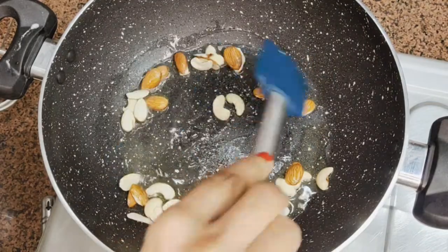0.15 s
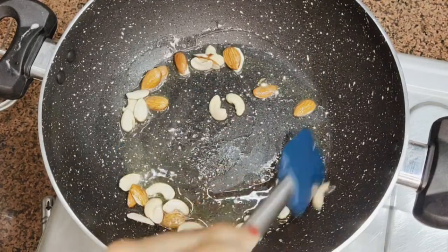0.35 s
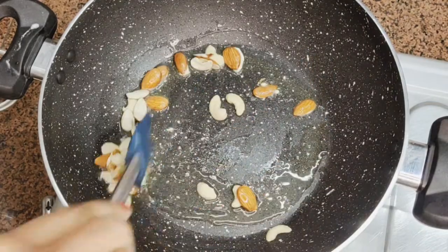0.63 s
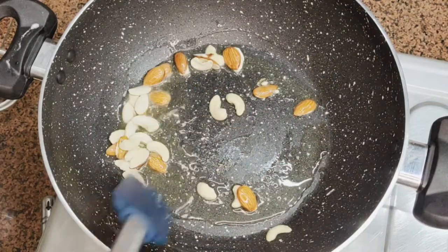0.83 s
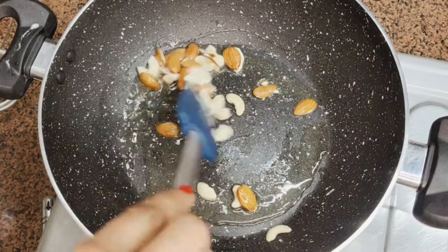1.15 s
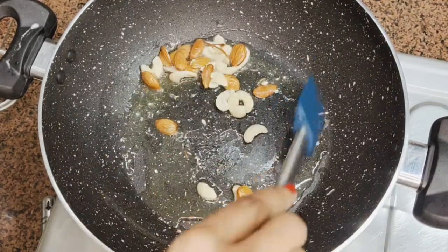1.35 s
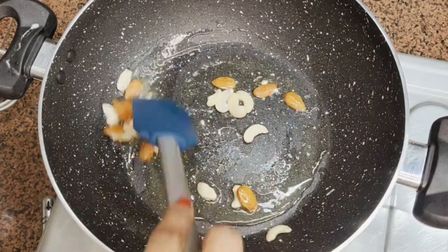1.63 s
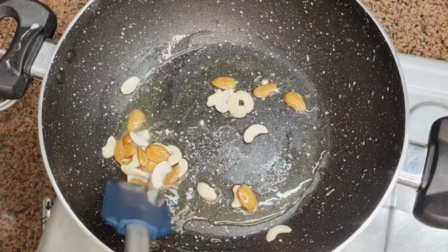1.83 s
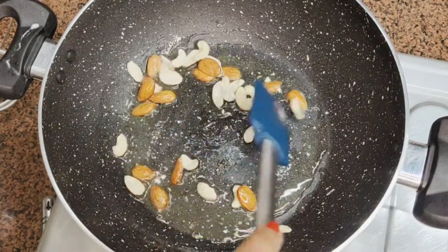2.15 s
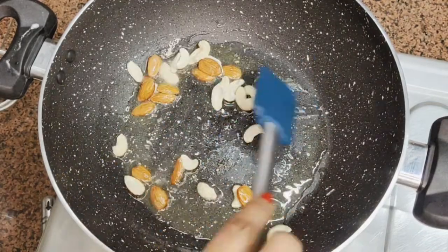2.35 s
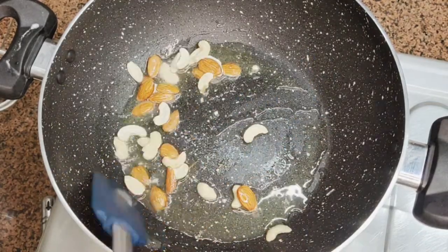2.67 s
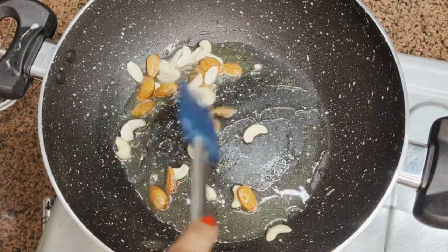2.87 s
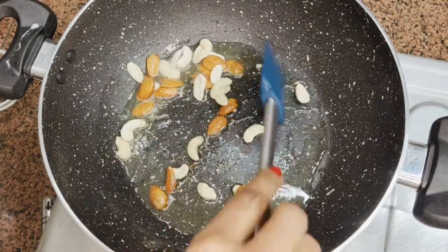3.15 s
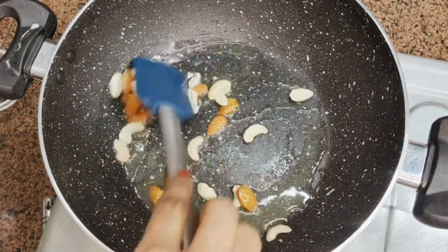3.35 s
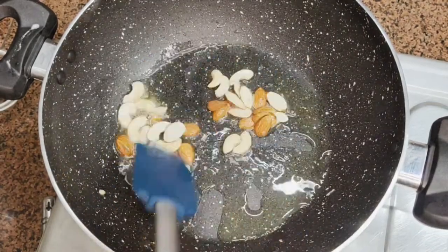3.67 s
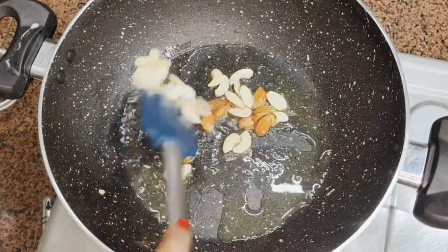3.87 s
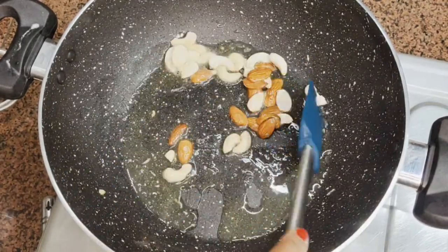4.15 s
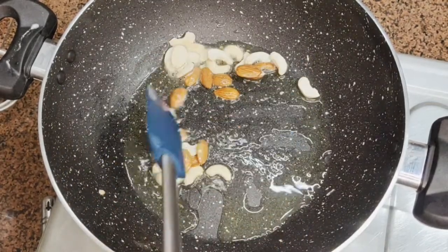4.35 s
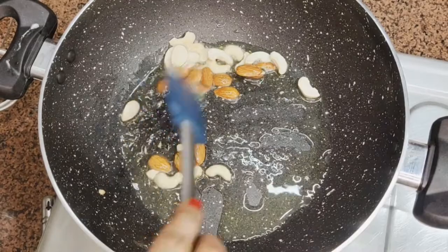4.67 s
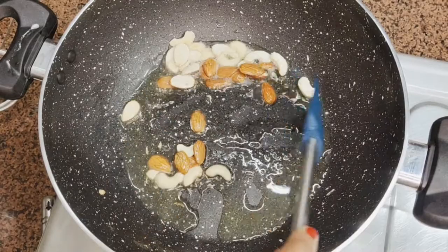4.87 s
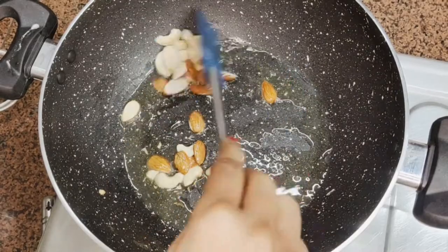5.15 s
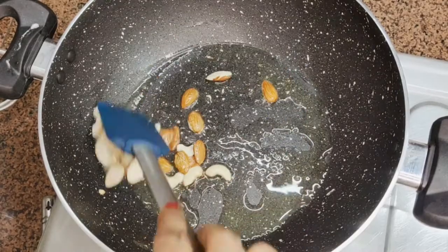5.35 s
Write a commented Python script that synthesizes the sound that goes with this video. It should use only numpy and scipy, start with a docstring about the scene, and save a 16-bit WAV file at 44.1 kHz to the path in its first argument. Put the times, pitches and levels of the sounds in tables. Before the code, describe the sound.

A soft blade strokes through hot fat in a coated pan, several strokes in irregular rhythm. Gritty scraping and low rubbing come with hollow pan knocks, little damped two-note nut taps, sharp cracks and tiny squeaks. Quiet pauses reveal delicate spitting bubbles and faint hum. Near microphones, small room, short reflections, with one very brief dropout around three and a half seconds.

```python
"""A silicone spatula strokes cashews and almonds round a nonstick pan of hot fat on a humming, hissing stove.
From the start friction noise slides and rumbles, bubbles spit, and the soft blade thuds and rings the pan.
Nuts then knock the wall into two damped notes, hard contacts crack, and stick-slip squeaks join in.
A small kitchen echoes the contacts; at about 3.45 s the level drops for an instant with a soft pop."""
import sys
import numpy as np
from scipy import signal
from scipy.fft import rfft, irfft, next_fast_len
from scipy.io import wavfile
from scipy.ndimage import uniform_filter1d

SR = 44100
rng = np.random.default_rng(int(sys.argv[2]) if len(sys.argv) > 2 else 0)


def wrap_up_sound(samples):
    """Save the sound to the file named by the first command line argument, as 16-bit audio."""
    columns = np.atleast_2d(samples).T
    # keep every value between -1 and 1, then stretch to whole-number steps
    tamed = np.clip(columns, -1, 1)
    steps = np.round(tamed * 32767).astype(np.int16)
    wavfile.write(sys.argv[1], SR, steps)


N = 242991
TIME = np.arange(N) / SR   # s
AGE = TIME[:SR * 2 // 5]   # s since a contact

# strokes: [full pressure t/s, swell t/s, hold t/s, relative levels of hiss/dB, fizz/dB, blade rumble/dB]
STROKES = [(0.0, 0.014, 0.025, -54, -59.5, -48), (0.3, 0.088, 0.45, -80, -74, -60),
           (0.559, 0.1, 0.053, -42.5, -60, -49.5), (0.958, 0.019, 0.13, -52.5, -57, -34),
           (1.089, 0.092, 0.072, -47, -57.5, -42), (1.356, 0.019, 0.052, -45.5, -49.5, -70),
           (1.587, 0.25, 0.067, -46.5, -58.5, -51), (1.802, 0.46, 0.031, -56.5, -64, -68.5),
           (2.002, 0.28, 0.09, -51.5, -59, -56), (2.413, 0.08, 0.11, -52.5, -63, -58.5),
           (2.737, 0.023, 0.16, -51.5, -61, -43.5), (3.336, 0.1, 0.076, -44.5, -58, -47),
           (3.512, 0.052, 0.095, -50.5, -61, -52.5), (3.925, 0.15, 0.048, -51, -59.5, -52),
           (4.009, 0.042, 0.0017, -42.5, -51, -40), (4.308, 0.075, 0.059, -50, -57, -59),
           (4.639, 0.017, 0.0098, -35, -46, -45), (5.151, 0.1, 0.044, -43.5, -55, -42),
           (5.233, 0.027, 0.091, -39, -61, -49.5)]
# spectra of sliding hiss, fine fizz, blade rumble and stove: [f/Hz, relative level per Hz/dB]
HISS_SPECTRUM = [(400, -6.5), (750, -36), (1000, 3.5), (1300, 0.5), (1600, -13.5), (2000, 0), (2500, 1.5),
                 (3600, 4), (4900, 0.5), (6500, -4.5), (9000, -13), (16000, -53)]
FIZZ_SPECTRUM = [(2500, -22), (5000, 1), (6800, -0.5), (7800, -2), (8600, -3.5), (9500, -10), (11000, -8),
                 (12200, -12.5), (14500, -12), (16000, -40)]
RUMBLE_SPECTRUM = [(25, -43), (55, -53), (90, 2.5), (120, -3), (180, 2.5), (230, -0.5), (300, 1.5),
                   (420, 4.5), (540, 5.5), (680, 6), (950, 3.5), (1300, -4.5), (2500, -42), (8000, -78)]
STOVE_SPECTRUM = [(25, -22), (60, 19), (110, -6), (180, 0), (350, -8), (540, -10), (850, -79), (1300, -3),
                  (3000, -24), (7500, -52), (10000, -11), (15000, -4)]
# high modes of the wall, stirred by sliding: [f/Hz, width/Hz, relative level/dB]
HIGH_MODES = [(1704, 147, 20), (2163, 6.7, 11), (2703, 35, 7), (3330, 26, 10), (3910, 10, 10.5),
              (5300, 140, -31), (7920, 61, 9)]
# edges of the bands that flicker separately as the contact shifts: [f/Hz]
PATCH_EDGES = (1500, 2400, 3700, 5600)
# the pan on its support: [f/Hz, relative level/dB, decay by 60 dB t/s]
PAN_MODES = [(118.1, -1, 0.99), (176.8, -2, 0.38), (248.2, -3.5, 0.48), (303.1, -0.5, 0.36),
             (424.7, -2, 0.27), (545.4, -4.5, 0.29), (678, 3, 0.35), (831, -23, 0.25), (917, -10, 0.66),
             (1128, 12.5, 0.051), (1240, 7.5, 0.35), (1344, 13.5, 0.059), (1637, 1, 0.52),
             (2170, 8.5, 0.27)]
# the wall's two notes, damped by blade and fat: [f/Hz, width/Hz]
WALL_NOTES = [(690, 74), (1360, 68)]
# blade landings, lower when softer: [t/s, relative level/dB, centre f/Hz, thud decay by 60 dB t/s, free ring/dB]
BUMPS = [(0.004, -42, 383, 0.11, 2.5), (0.276, -40, 284, .06, -3.5), (0.296, -39.5, 357, 0.074, -3.5),
         (0.391, -48.5, 282, 0.15, 2), (0.944, -33.5, 386, 0.11, 5.5), (0.967, -22, 396, 0.081, -1),
         (0.977, -33, 422, 0.09, 9.5), (0.995, -25.5, 422, 0.083, -2.5), (1.041, -25.5, 516, 0.041, -1.5),
         (1.05, -25, 494, 0.077, -5.5), (1.108, -29, 500, .05, -3), (1.151, -38, 264, 0.11, -4),
         (1.186, -38, 440, 0.058, -15), (1.238, -37.5, 184, .12, -8), (1.449, -30.5, 137, 0.15, 4.5),
         (1.475, -32.5, 142, 0.21, -6), (1.536, -51, 140, 0.13, -14), (1.607, -26, 423, 0.049, -10.5),
         (1.72, -35, 410, 0.084, -8.5), (1.754, -44, 403, 0.091, -13), (1.817, -49.5, 324, 0.09, -10),
         (2.705, -28, 946, 0.12, 6), (2.721, -32, 405, 0.19, 8.5), (2.737, -29.5, 317, 0.16, 1),
         (2.757, -35, 402, 0.11, -13), (2.852, -29.5, 430, 0.088, -1.5), (2.881, -41, 248, .12, 1.5),
         (3.311, -30, 570, 0.07, -2), (3.518, -30.5, 410, 0.04, -7), (3.598, -32.5, 370, 0.045, -10),
         (3.69, -43.5, 292, 0.044, -1.5), (3.956, -32, 380, 0.058, -8), (3.992, -33, 384, 0.17, -0.5),
         (4.558, -63.5, 378, 0.076, 12.5), (5.123, -23, 800, 0.038, -10), (5.324, -27, 174, 0.03, -16.5),
         (5.455, -33, 400, 0.086, -8), (5.487, -37.5, 392, 0.044, -13)]
# force spectrum of a landing of reference softness: [f/Hz, relative level/dB]
LANDING_FORCE = [(25, -49), (55, -51), (90, -32), (150, -5.5), (240, -10.5), (400, 3), (850, -4),
                 (1200, -14.5), (2300, -26), (4000, -36), (15000, -95)]
# nuts that knock or skid: [t/s, high note f/Hz, relative low note/dB, relative high note/dB, high note length t/s]
KNOCKS = [(0.06, 1361, -40.5, -39, 0.016), (0.091, 1370, -42, -46, 0.014), (0.124, 1373, -34.5, -22, 0.015),
          (0.425, 1362, -70, -53, 0.043), (0.499, 1357, -60, -24.5, 0.008),
          (0.531, 1366, -58, -32.5, 0.025), (0.55, 1365, -53, -23, 0.0033),
          (0.557, 1390, -49, -23.5, 0.0095), (0.584, 1374, -49, -34, 0.02), (0.947, 1290, -45, -32, 0.0095),
          (0.965, 1445, -26, -34, 0.0096), (1.04, 1320, -32, -33, 0.0046), (1.051, 1330, -38, -32, 0.004),
          (1.074, 1300, -40, -37, 0.005), (1.128, 1280, -36, -32, 0.013), (1.156, 1345, -43, -34, 0.0088),
          (1.186, 1345, -35.5, -33.5, 0.014), (1.279, 1280, -42, -38.5, 0.01),
          (1.355, 1320, -31, -27.5, 0.0035), (1.526, 1356, -50, -33.5, 0.015),
          (1.548, 1320, -49, -36.5, 0.025), (1.589, 1330, -58, -32, 0.01),
          (1.607, 1350, -31, -22.5, 0.0043), (1.941, 1335, -53, -38.5, 0.017),
          (2.005, 1290, -55, -32.5, 0.0037), (2.015, 1370, -28.5, -32, 0.008),
          (2.039, 1403, -35, -44, 0.015), (2.058, 1350, -43, -39, 0.019), (2.076, 1325, -32.5, -38, 0.0079),
          (2.087, 1363, -31, -43, 0.011), (2.114, 1395, -38, -41, 0.0077), (2.16, 1350, -38, -46, 0.0064),
          (2.183, 1340, -45.5, -55, 0.013), (2.222, 1330, -49, -45, 0.0081),
          (2.348, 1323, -52.5, -42.5, 0.015), (2.365, 1347, -47.5, -41.5, 0.012),
          (2.418, 1343, -48.5, -35.5, 0.03), (2.452, 1366, -28, -38, 0.013),
          (2.481, 1310, -31, -56, 0.0054), (2.505, 1337, -35, -31.5, 0.01),
          (2.521, 1366, -47.5, -36, 0.019), (2.55, 1385, -38.5, -56, 0.0046),
          (2.718, 1320, -24, -25, 0.011), (2.788, 1298, -39, -28, 0.019), (2.825, 1360, -47, -32, 0.011),
          (2.963, 1366, -22.5, -22, 0.01), (2.992, 1400, -26.5, -28.5, 0.00444),
          (3.229, 1333, -44.5, -27.5, 0.0093), (3.285, 1285, -64, -32, 0.0059),
          (3.309, 1314, -26.5, -43, 0.024), (3.388, 1294, -36.5, -58, 0.022),
          (3.533, 1380, -42, -41, 0.016), (3.576, 1360, -44, -44, 0.017), (3.871, 1390, -41, -52, 0.0072),
          (3.905, 1340, -40.5, -45, 0.012), (3.92, 1350, -28, -40, 0.0058),
          (3.937, 1390, -27.5, -32, 0.014), (4.261, 1357, -46, -53, 0.016), (4.3, 1360, -39, -41, 0.017),
          (4.325, 1353, -37.5, -38, 0.018), (4.343, 1406, -44, -59, 0.013),
          (4.376, 1350, -39.5, -44, 0.0035), (4.381, 1342, -36.5, -43, 0.02),
          (4.713, 1343, -34, -25, 0.011), (4.773, 1345, -43.5, -30.5, 0.0074),
          (5.12, 1333, -24, -51, 0.032), (5.171, 1352, -35, -46, 0.018), (5.241, 1320, -51, -35, 0.01),
          (5.268, 1340, -53, -36, 0.0087)]
# scuff of a nut's skin: [f/Hz, relative level per Hz/dB]
SCUFF_SPECTRUM = [(250, -7), (600, 2), (1000, -6), (1600, 1.5), (2000, 3.5), (3200, -11.5), (8000, -35.5)]
# hard contacts: [t/s, relative low/dB, middle/dB, treble/dB, top/dB, click aimed at microphones/dB, left-right/dB]
CRACKS = [(0.1234, -39, -42, -54.5, -56.5, -5.5, -4), (0.478, -68, -41, -71, -61, -3.5, -3),
          (0.924, -87, -41.5, -35, -47, -18, -7), (1.361, -33.5, -27, -28, -31, 7.5, -2.5),
          (1.4207, -32, -29, -71, -66, -3, -2), (1.5204, -42.5, -51, -48, -53, 1, 0),
          (1.6669, -46, -51, -51, -45, 1.5, 3), (1.88, -46, -29, -35, -39, 1.5, -4.5),
          (2.341, -66, -52.5, -90, -78, -4, 13), (2.408, -51, -43, -73, -70, -4, 1),
          (2.6222, -48.5, -38.5, -43, -70, 1.5, -5), (2.7045, -32, -34, -44, -88, -5.5, 4),
          (2.784, -36, -39, -59, -74, 0, -9), (2.9637, -42, -43.5, -64, -67, -16, 1),
          (3.229, -80, -41.5, -51.5, -51, -0.5, 8), (3.631, -43.5, -43, -47, -66, -2.5, 0),
          (3.691, -45, -41, -56, -65, 3, 0), (3.9904, -32.5, -33, -27.5, -40.5, 6, -9),
          (4.624, -43.5, -24, -35.5, -45.5, 0.5, 4), (4.7139, -35, -32, -50, -72, -2, -3),
          (4.83, -47, -57, -55, -66, 3.5, -1)]
# brief resonances of a hard contact: [f/Hz, relative level/dB, decay by 60 dB t/s]
SHELL_MODES = [(800, 3.5, 0.0029), (1320, -8.5, 0.02), (1810, -12, 0.028), (2300, -22, 0.028),
               (3100, -5.5, 0.0053), (5300, 1, 0.0054), (7880, 2, 0.0055), (13700, -4, 0.0033)]
# chirps and rasps on the oily coating: [t/s, f/Hz, width/Hz, level/dB, length t/s]
SQUEAKS = [(0.482, 2580, 1700, -43.5, 0.0036), (0.557, 2760, 1880, -37, 0.0077),
           (1.102, 7350, 450, -39.5, 0.0085), (1.146, 8460, 450, -49, 0.006),
           (1.417, 2380, 2400, -36, 0.0018), (1.523, 1900, 1100, -35.5, .002),
           (2.927, 7570, 450, -46, 0.0056), (3.427, 3600, 1900, -41, 0.021),
           (3.803, 3800, 700, -56.5, 0.11), (5.232, 1150, 600, -46, 0.0042),
           (5.241, 2100, 400, -38, 0.0044)]
# stereo width: [f/Hz, side minus mid level/dB]
WIDTH = [(60, -0.5), (150, -17), (350, -13), (700, -3), (1400, -1.5), (3000, 0), (15000, 0)]
# reverberation of the kitchen: [f/Hz, decay by 60 dB t/s]
KITCHEN_T60 = [(120, 0.84), (500, 0.38), (2000, 0.38), (6000, 0.38), (15000, 0.31)]
# spectrum of the echoes: [f/Hz, relative level per Hz/dB]
ECHO_SPECTRUM = [(60, 20.4), (5200, 1.3), (8500, 3.4), (11000, 1.3), (17000, 1.4)]
# brief loss of level: [offset and loss begin t/s, offset ends t/s, level returns t/s]
DROPOUT = (3.453, 3.4767, 3.491)

SWELL_DB = 20   # gained during a stroke's swell
HISS_FADE_DB_PER_S, FIZZ_FADE_DB_PER_S, RUMBLE_FADE_DB_PER_S = 127, 126, 120   # once the blade lets go
# relative levels between strokes, and the spread of the slow rise and fall of the fizz
REST_HISS_DB, REST_FIZZ_DB, SIMMER_SWING_DB = -66, -74, 2.5
LOW_NOTE_DB, HIGH_NOTE_DB = -17, -9.5   # relative to the rumble and hiss levels that drive them
SPITS_PER_S, SPIT_RMS_DB, SPIT_SPREAD_DB, SPIT_Q = 260, -71, 1, 72
SPIT_LOW_HZ, SPIT_HIGH_HZ, SPIT_TILT_DB_PER_OCTAVE = 2250, 11600, -3.5
STOVE_RMS_DB = -73
THUD_CENTRE_HZ = 426   # reference softness
PAN_WANDER = .004   # the blade's load shifts each mode: spread as a share of its pitch
NUT_PAN_DB, NUT_PAN_SPREAD_DB = -1, 6   # left minus right
SCUFF_HIGH_DB, SCUFF_LOW_DB, SCUFF_T60_S = -11.5, -22, .045   # levels relative to the two notes
LOW_NOTE_RATIO, NOTE_WANDER = .516, .02   # low over high pitch; spread as a share of the low pitch
CUTOFF_HZ = 15600


def from_db(db):
    """Logarithmic level: decibels become amplitude gain."""
    return 10 ** (np.asarray(db) / 20)


def rms_one(x):
    """Normalisation: mean power becomes one."""
    return x / np.sqrt(np.mean(x ** 2) + 1e-20)


def at_hz(points, hz):
    """Linear interpolation on a logarithmic frequency axis."""
    freqs, values = np.transpose(points)
    return np.interp(np.log(np.maximum(hz, 1)), np.log(freqs), values)


def dying(t60):
    """Exponential decay: amplitude falls 60 dB in t60."""
    return np.exp(-np.log(1000) * AGE / t60)


def panned(pan_db):
    """Interaural level difference: gains for left and right."""
    return from_db(np.array([[pan_db], [-pan_db]]) / 2)


def add(track, s, sound):
    """Superposition: a sound joins the track at time s."""
    at = max(round(s * SR), 0)
    track[:, at:at + sound.shape[1]] += sound[:, :N - at]


def drift(rate):
    """Low-passed randomness: twice-averaged noise of rms 1."""
    length = int(SR / rate)
    once = uniform_filter1d(rng.standard_normal(N), length)
    return rms_one(uniform_filter1d(once, length))


def coloured(pair, gain_at):
    """Spectral shaping of mid and side: narrow in the bass, wide in the treble; rms 1."""
    size = next_fast_len(pair.shape[1])
    hz = np.arange(size // 2 + 1) * SR / size
    mid, side = rfft(pair, size) * gain_at(hz)
    side = side * from_db(at_hz(WIDTH, hz))
    return rms_one(irfft([mid + side, mid - side], size)[:, :pair.shape[1]])


def noise(spectrum, size=N):
    """Filtered noise: random stereo sound with a given spectrum, rms 1."""
    return coloured(rng.standard_normal((2, size)), lambda hz: from_db(at_hz(spectrum, hz)))


def burst(spectrum, t60):
    """Decaying noise: its envelope starts at rms 1 and is cut off after t60 (10 ms at least)."""
    envelope = dying(t60)[:int(max(t60, 0.01) * SR)]
    shaped = rms_one(noise(spectrum, size=len(envelope)) * envelope)
    sound = shaped * np.sqrt(np.mean(envelope ** 2))
    return np.pad(sound, ((0, 0), (0, len(AGE) - len(envelope))))


def low_cut(x, edge_hz):
    """Second-order high-pass filtering."""
    sos = signal.butter(2, edge_hz, "high", fs=SR, output="sos")
    return signal.sosfilt(sos, x + 1e-18)


def resonance(hz, centre, width):
    """Forced damped oscillator: response of one mode, 1 at its peak."""
    return 1j * hz * width / (centre ** 2 - hz ** 2 + 1j * hz * width)


def swing(hz, clock=AGE):
    """Interchannel phase: a mode's phases differ more where the stereo table is wider."""
    apart = np.arctan(from_db(at_hz(WIDTH, hz))) * rng.choice([-1, 1])
    return np.sin(2 * np.pi * hz * clock + np.array([[apart], [-apart]]))


def grains(per_s, spread_db, smooth):
    """Granular friction: random slips of uneven size on a bed of smooth noise."""
    sizes = from_db(spread_db * np.minimum(rng.exponential(1, N), 3.5))
    slips = (rng.random(N) < per_s / SR) * sizes * rng.uniform(-0.88, 1, (2, N))
    return rms_one(slips) + smooth * rng.standard_normal((2, N))


def pressure(level_dbs, fade_db_per_s, rest_db=-90):
    """Power addition: strokes swell, hold and fade, and overlaps add up; returns dB."""
    power = from_db(rest_db) ** 2
    for (s, swell_s, hold_s, *_), db in zip(STROKES, level_dbs):
        swell_db = SWELL_DB * np.maximum(s - TIME, 0) / swell_s
        fade_db = fade_db_per_s * np.maximum(TIME - s - hold_s, 0)
        power = power + from_db(db - np.minimum(swell_db + fade_db, 90)) ** 2
    return 10 * np.log10(power)


def patchy(x, patch_db=1.66, patches_per_s=60):
    """Band-wise amplitude modulation: as the contact shifts, bands below the top edge flicker; rms 1."""
    out = 0
    for hz in PATCH_EDGES:
        below = signal.sosfiltfilt(signal.butter(4, hz, fs=SR, output="sos"), x)
        out = out + below * from_db(patch_db * drift(patches_per_s))
        x = x - below
    return rms_one(out + x)


def sliding(hiss_db, fizz_db, slide_db=2.5, fat_db=7.5):
    """Friction excitation: dense slips through the fat stir the wall's high modes, with a fine fizz on top."""
    def wall(hz):
        power = sum(np.abs(from_db(db - 2.0) * resonance(hz, centre, width)) ** 2
                    for centre, width, db in HIGH_MODES)
        return np.sqrt(1 + power)
    coarse = grains(2200, 2.8, smooth=.6)
    fine = grains(900, 4.5, smooth=.95)
    slide = patchy(coloured(coarse, lambda hz: from_db(at_hz(HISS_SPECTRUM, hz)) * wall(hz)))
    fizz = coloured(fine, lambda hz: from_db(at_hz(FIZZ_SPECTRUM, hz)) * wall(hz))
    flutter = from_db(1.1 * drift(160))
    return flutter * (from_db(slide_db + hiss_db) * slide + from_db(fat_db + fizz_db) * fizz)


def rubbing(rumble_db, note_dbs, mode_width_hz=16, between=0.61):
    """Forced vibration: the dragging blade shakes the pan, and rolling nuts sustain the wall's notes."""
    def body(hz):
        modes = sum(np.abs(resonance(hz, centre, mode_width_hz)) ** 2 for centre, _, _ in PAN_MODES)
        # "between" is the response left between the modes
        return from_db(at_hz(RUMBLE_SPECTRUM, hz)) * np.sqrt(between ** 2 + 2 * modes)
    judder = grains(450, 2.7, smooth=.65)
    out = from_db(rumble_db) * coloured(judder, body)
    for (centre, width), db in zip(WALL_NOTES, note_dbs):
        touches = grains(500, 2.0, smooth=.7)
        note = coloured(touches, lambda hz: resonance(hz, centre, width) * resonance(hz, centre, centre))
        swell = np.sqrt(uniform_filter1d(np.mean(note ** 2, axis=0), size=3000))
        out += from_db(db) * note / swell   # steady pressure keeps the note even
    return out


def simmer(count=14, clump_db=0.5):
    """Impulse response of resonators: tiny bubbles burst in clumps, each at one of a few pitches."""
    born = rng.random(N) < SPITS_PER_S * from_db(clump_db * drift(20)) / SR
    sizes = from_db(SPIT_SPREAD_DB * np.minimum(rng.exponential(1, N), 3))
    bursts = born * sizes * rng.uniform(-1, 1, (2, N))
    dealt = rng.integers(0, count, N)   # the pitch dealt to each bubble
    out = np.zeros((2, N))
    for k, hz in enumerate(np.geomspace(SPIT_LOW_HZ, SPIT_HIGH_HZ, count)):
        gain = from_db(SPIT_TILT_DB_PER_OCTAVE * np.log2(hz / SPIT_LOW_HZ)) / np.sqrt(hz)
        b, a = signal.iirpeak(hz, SPIT_Q, fs=SR)
        out += gain * signal.lfilter(b, a, bursts * (dealt == k) + 1e-18)
    return from_db(SPIT_RMS_DB) * rms_one(out)


def stove():
    """Stationary noise: a faint steady hum and hiss."""
    return from_db(STOVE_RMS_DB) * noise(STOVE_SPECTRUM)


def bumps(ring_db=-9.5, rise_s=0.00056):
    """Impact excitation: the soft blade lands with a juddering thud and leaves the pan's modes ringing."""
    out = np.zeros((2, N))
    judder = rms_one(from_db(2.5 * drift(130)))
    for s, level_db, centre_hz, thud_t60, free_db in BUMPS:
        softness = THUD_CENTRE_HZ / centre_hz
        force = [(hz / softness, db) for hz, db in LANDING_FORCE]
        start = rng.integers(N - len(AGE))
        thud = burst(force, thud_t60) * judder[start:start + len(AGE)]
        ring = 0
        for hz, db, t60 in PAN_MODES:
            gain = from_db(db + at_hz(force, hz)) * rng.choice([-1, 1])
            loaded_hz = hz * (1 + rng.normal(0, PAN_WANDER))
            ring = ring + gain * swing(loaded_hz) * dying(t60)
        attack = 1 - np.exp(-AGE / (rise_s * softness))   # a softer landing rises more slowly
        add(out, s, from_db(level_db) * (thud + from_db(ring_db + free_db) * ring) * attack)
    return out


def knocks(level_db=-2.0, sharp=0.019, settle_s=0.00084, after_db=-27, after_t60=0.096,
           rise_s=0.0012, low_lasts=1.61, choke=2.0):
    """Contact damping: a nut scuffs and starts sharp notes that settle, are choked, and leave a faint ring."""
    out = np.zeros((2, N))
    clock = AGE + sharp * settle_s * (1 - np.exp(-AGE / settle_s))   # pitch starts sharp by this share
    chatter = from_db(2.2 * drift(450))
    attack = 1 - np.exp(-AGE / rise_s)
    for s, high_hz, low_db, high_db, length in KNOCKS:
        scuff_gain = from_db(SCUFF_HIGH_DB + high_db) + from_db(SCUFF_LOW_DB + low_db)
        sound = scuff_gain * burst(SCUFF_SPECTRUM, SCUFF_T60_S)
        low_hz = high_hz * LOW_NOTE_RATIO * (1 + rng.normal(0, NOTE_WANDER))
        notes = [(low_hz, low_db, low_lasts * length), (high_hz, high_db, length)]
        for hz, db, lasts in notes:
            start = rng.integers(N - len(AGE))
            contact = np.exp(-(AGE / lasts) ** choke) * chatter[start:start + len(AGE)]
            shape = contact + from_db(after_db) * dying(after_t60)
            sound = sound + from_db(db) * shape * swing(hz, clock) * attack
        pan_db = rng.normal(NUT_PAN_DB, NUT_PAN_SPREAD_DB)
        add(out, s, from_db(level_db) * panned(pan_db) * sound)
    return out


def cracks(level_db=10.0, grit_db=-9.5, grit_t60=0.056, snap_t60=0.0044, rise_s=0.0001):
    """Directivity of hard impacts: clicks and grit, as the microphones and as the walls receive them."""
    direct, spread = np.zeros((2, 2, N))
    left_lag = np.array([[1.5], [0]]) / SR   # the right microphone is nearer
    clock = np.maximum(AGE - left_lag, 0)
    for s, low_db, middle_db, treble_db, top_db, aimed_db, pan_db in CRACKS:
        force = [(900, low_db), (2200, middle_db), (3400, middle_db), (7800, treble_db), (11000, top_db)]
        strength = np.linalg.norm(from_db([low_db, middle_db, treble_db, top_db]))
        ring = sum(from_db(db + at_hz(force, hz)) * np.sin(2 * np.pi * hz * clock) * dying(t60)
                   for hz, db, t60 in SHELL_MODES)
        grit_force = [(60, low_db - 15), (300, low_db + 4.5)] + force + [(15000, top_db - 14)]
        grit = from_db(grit_db) * strength * burst(grit_force, grit_t60)
        snap = strength * burst(force + [(15000, top_db - 1.5)], snap_t60)
        click = (ring + snap) * (1 - np.exp(-AGE / rise_s))
        add(direct, s, from_db(level_db) * (from_db(aimed_db) * panned(pan_db) * click + grit))
        add(spread, s, from_db(level_db) * (click + grit))
    return low_cut(np.array([direct, spread]), edge_hz=243)   # so small a contact radiates little bass


def squeaks():
    """Stick-slip friction: a narrow band of noise chirps, a wide one rasps."""
    out = np.zeros((2, N))
    for s, hz, width_hz, db, length in SQUEAKS:
        raw = rng.standard_normal((2, len(AGE)))
        chirp = coloured(raw, lambda f: resonance(f, hz, width_hz) ** 2)
        envelope = np.exp(-(AGE / length - 2) ** 2)   # peaks two lengths after it begins
        add(out, s - 2 * length, from_db(db) * chirp * envelope)
    return out


def kitchen(x, first_s=0.0041, build_s=0.0071):
    """Diffuse reverberation: convolution with echoes from near walls; the treble dies first."""
    edges = np.geomspace(60, 17000, 9)
    air = noise(ECHO_SPECTRUM, size=len(AGE))
    tail = 0
    for band in zip(edges, edges[1:]):
        sos = signal.butter(2, band, "band", fs=SR, output="sos")
        t60 = at_hz(KITCHEN_T60, np.sqrt(np.prod(band)))
        tail = tail + signal.sosfilt(sos, air) * dying(t60)
    build = np.clip((AGE - first_s) / build_s, 0, 1)
    tail = rms_one(tail * build) / np.sqrt(len(AGE))
    return signal.fftconvolve(x, tail, axes=1)[:, :N]


def scene(bump_room_db=-21.0, knock_room_db=-13.0, crack_room_db=-3.5):
    """Superposition: strokes, contacts and their echoes over the simmer and the stove."""
    *_, hisses, fizzes, rumbles = np.transpose(STROKES)
    hiss_db = pressure(hisses, HISS_FADE_DB_PER_S, REST_HISS_DB)
    fizz_db = pressure(fizzes, FIZZ_FADE_DB_PER_S, REST_FIZZ_DB + SIMMER_SWING_DB * drift(14))
    rumble_db = pressure(rumbles, RUMBLE_FADE_DB_PER_S)
    note_dbs = rumble_db + LOW_NOTE_DB, hiss_db + HIGH_NOTE_DB
    strokes = sliding(hiss_db, fizz_db) + rubbing(rumble_db, note_dbs)
    background = simmer() + stove()
    bump = bumps()
    knock = low_cut(knocks(), edge_hz=600)
    crack, crack_spread = cracks()
    squeak = squeaks()
    to_room = from_db(bump_room_db) * bump + from_db(knock_room_db) * knock
    to_room = to_room + from_db(crack_room_db) * (crack_spread + squeak)
    contacts = bump + knock + crack + squeak
    return low_cut(strokes + background + contacts + kitchen(to_room), edge_hz=97)


def record(dry, dropout_db=-30):
    """Gating, clipping and low-pass: the level drops briefly with a soft pop; peaks and the top are cut."""
    sticks, falls, returns = DROPOUT
    held = -.012 * ((TIME > sticks) & (TIME < falls))   # constant offset
    gain = from_db(dropout_db * ((TIME > sticks) & (TIME < returns)))
    sound = np.clip(dry * gain + held, -1, 1)
    top_cut = signal.ellip(10, .1, 90, CUTOFF_HZ, fs=SR, output="sos")
    return signal.sosfilt(top_cut, sound)


dry = scene()
out = record(dry)
wrap_up_sound(out)
```